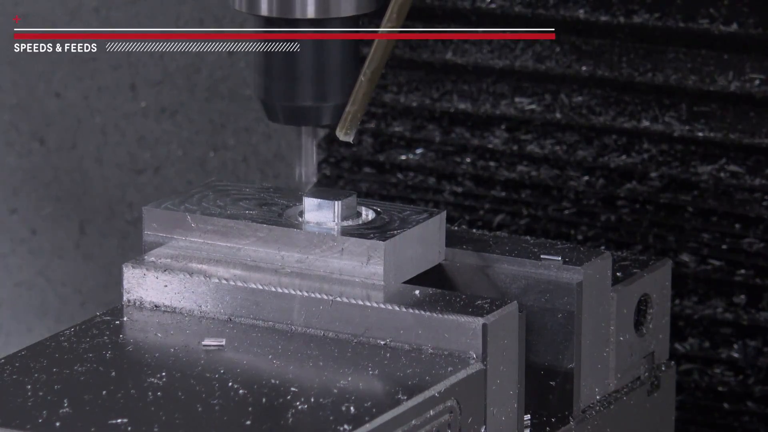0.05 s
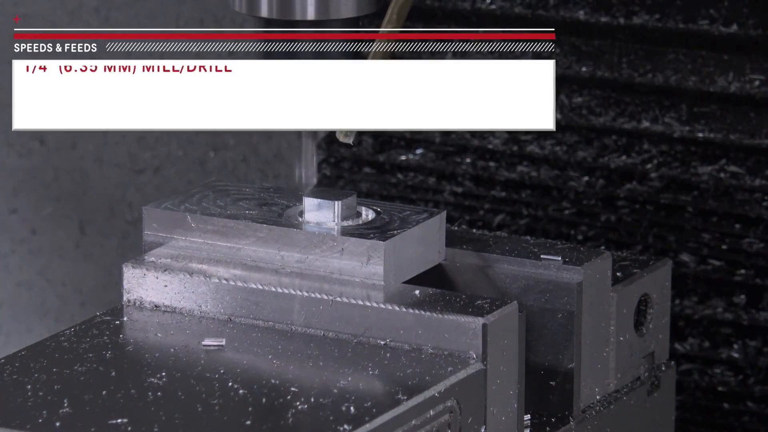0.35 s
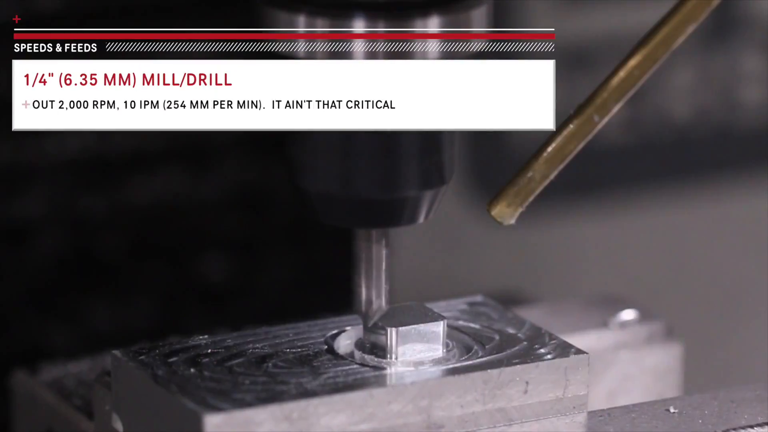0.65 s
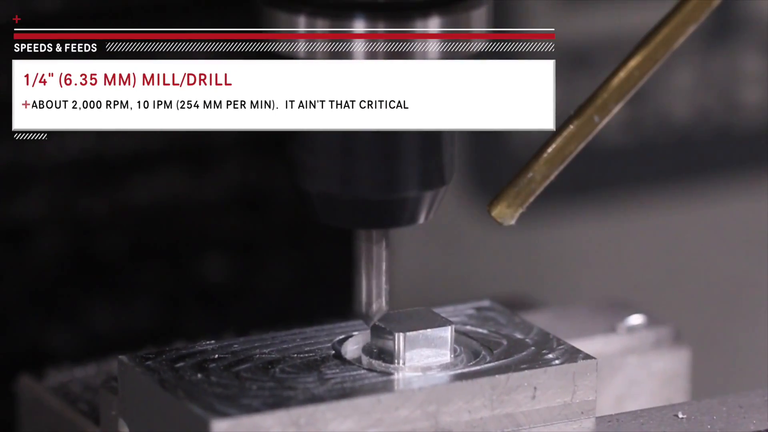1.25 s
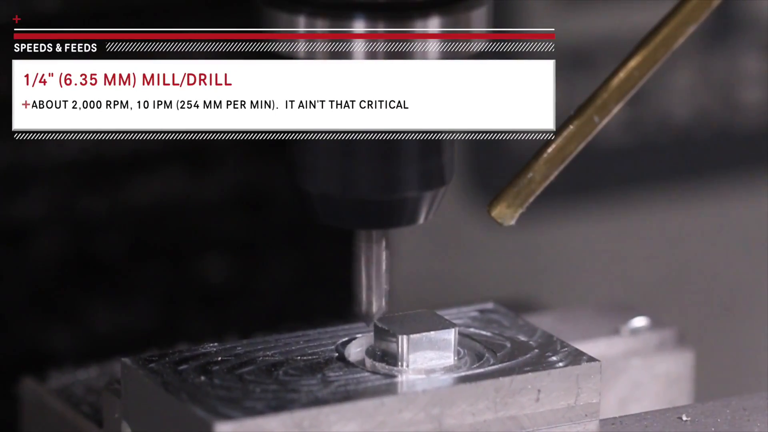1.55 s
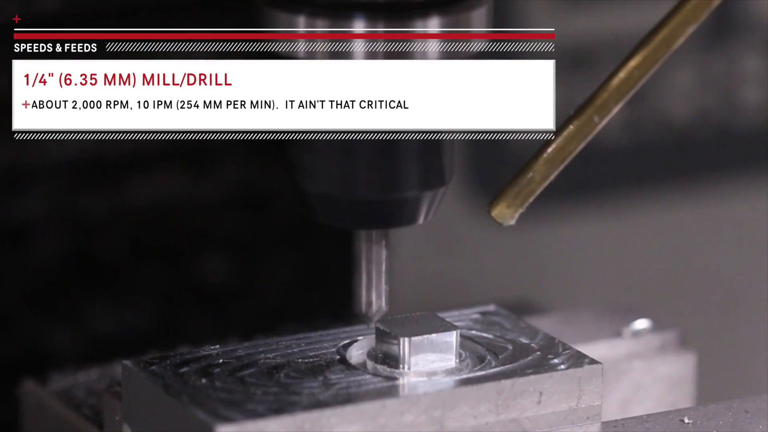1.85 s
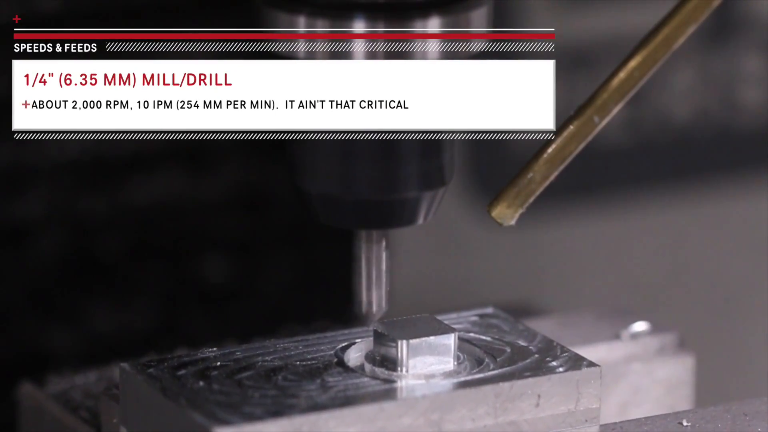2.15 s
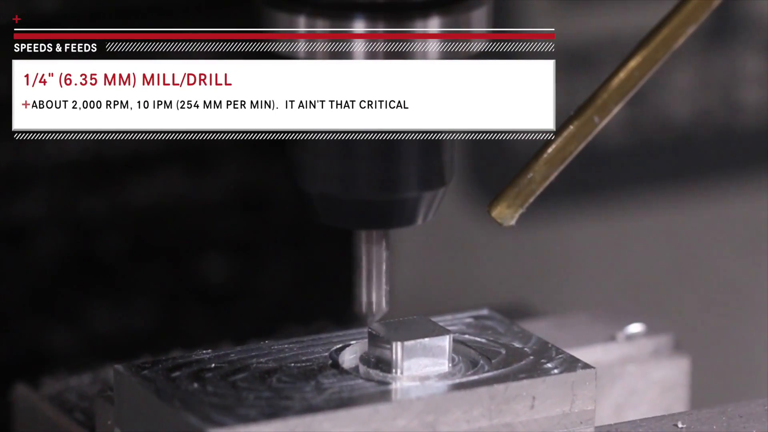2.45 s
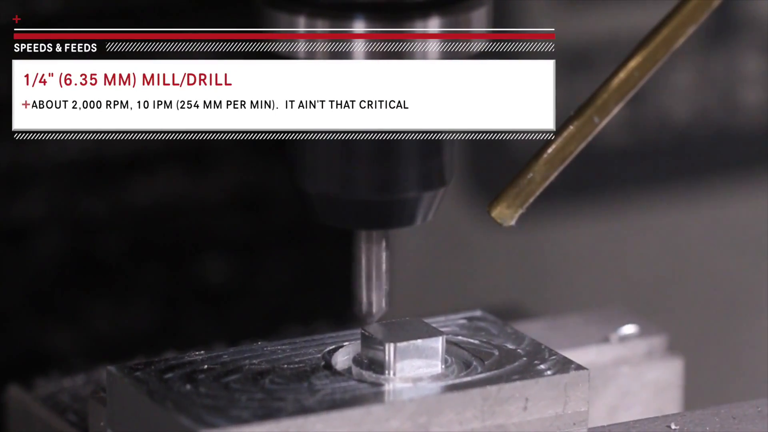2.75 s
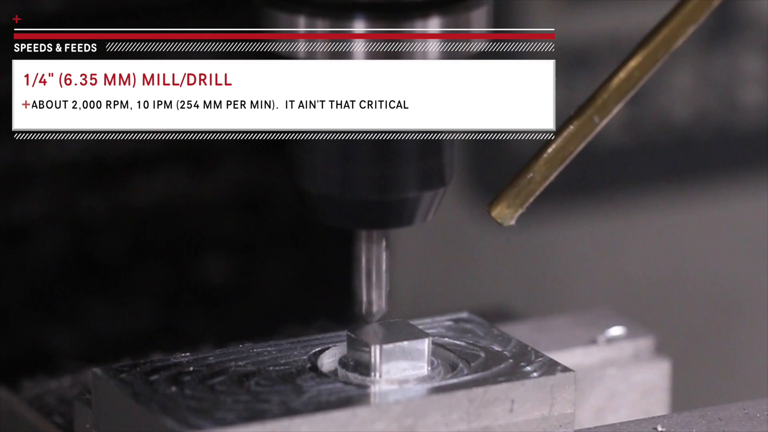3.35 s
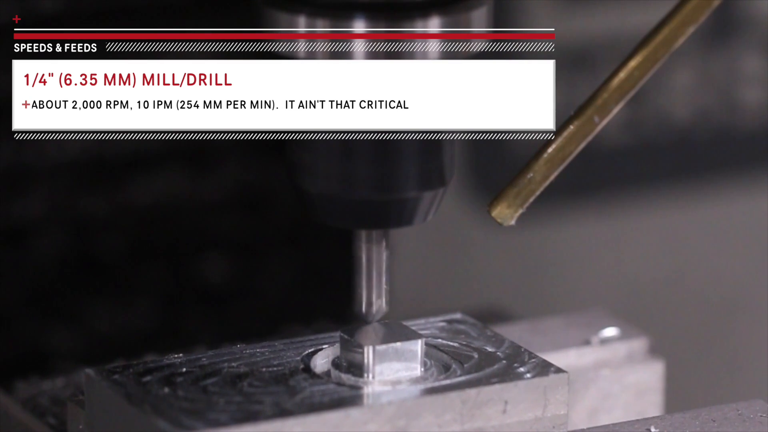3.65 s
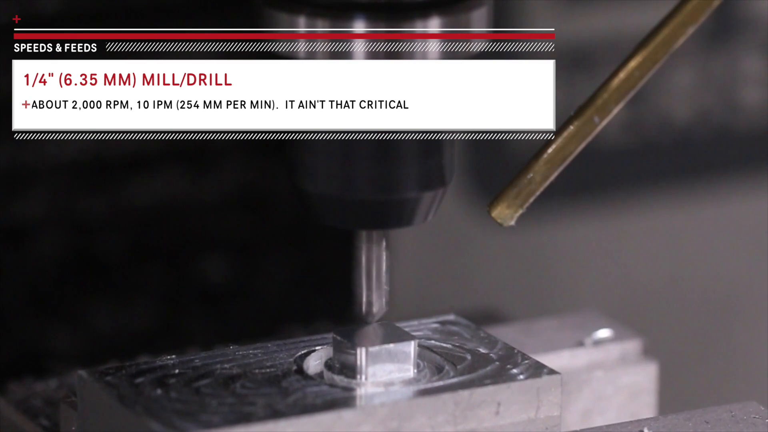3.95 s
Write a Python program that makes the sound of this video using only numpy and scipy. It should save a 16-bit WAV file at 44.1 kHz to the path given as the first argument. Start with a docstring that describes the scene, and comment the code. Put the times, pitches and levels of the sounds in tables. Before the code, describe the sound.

Bright, continuous air hiss blows over metal in a milling machine, heard up close. Beneath it, faint motors hum and change pitch twice with soft jolts. Later the hiss turns slightly louder, hollower and faintly whistling.

```python
"""Milling machine with an air jet

A milling machine cuts round a small metal boss (a raised stub) while a nozzle blows air at the cutter.
The jet hisses steadily; as the table moves, the air catches the edge of the boss and brightens, then
roars lower in the milled pocket. It whistles faintly, and hollow rings shift with the work. Two feed
drives hum below, jolting and trading speed at the corners, over the spindle. Metal walls colour the air."""
import sys
import numpy as np
from scipy import signal
from scipy.fft import rfft, irfft, next_fast_len
from scipy.io import wavfile
from scipy.ndimage import map_coordinates

SR = 44100
rng = np.random.default_rng(int(sys.argv[2]) if len(sys.argv) > 2 else 0)


def transcribe(u):
    """Save the signal u as a 16-bit wav file named by the first command-line argument.

    u: samples, shape (n,) or (channels, n), limited to [-1, 1]; the rate is SR.
    q: integer samples, one column per channel.
    """
    v = np.clip(np.atleast_2d(u).T, -1, 1)
    q = np.round(v * 32767).astype(np.int16)
    wavfile.write(sys.argv[1], SR, q)


N = 176400

# How alike left and right are for air striking the metal. Each row: frequency in Hz, likeness (1 = same).
WORK_LIKENESS = [(300, 1), (1500, 0.98), (2650, 1), (3200, 0.85), (4000, .5), (4600, 0.23), (5900, .05),
                 (8800, .05), (10500, 0.27), (12000, 0.61), (14500, .18)]


def jet():
    """Air rushes out of the nozzle and hisses steadily."""
    # Each row: time in seconds, level in dB.
    levels = [(0, -42.5), (.45, -42), (.9, -41.5), (1.4, -42), (1.75, -44), (2.4, -42), (3.3, -43.5),
              (4, -46)]
    # A bright hiss. Each row: frequency in Hz, relative level in dB.
    colour = [(200, -25), (700, -16.5), (1500, -16.5), (2100, -11.5), (2600, -7), (4500, -2), (7000, -0.8),
              (9400, 0), (12000, -3), (15500, -6.5)]
    # Each row: centre in Hz, width in Hz, boost in dB.
    resonances = [(2480, 200, 2.5), (3080, 420, -2.2), (4985, 170, 4), (5370, 200, 3.2), (6300, 200, 1),
                  (7300, 300, 3), (8250, 200, 1.5), (8720, 280, 3), (9310, 130, 4), (9630, 140, 4)]
    # Each row: frequency in Hz, likeness of left and right (1 = same).
    likeness = [(300, 1), (1500, 0.95), (2650, 1), (3100, 0.83), (4000, 0.65), (4600, 0.19), (6000, 0.29),
                (8500, 0.1), (10500, 0.054), (14000, -0.21)]
    return rushing_air(levels, colour, resonances, likeness)


def edge_hiss():
    """The air strikes the edge of the boss and hisses more brightly."""
    # Each row: time in seconds, level in dB.
    levels = [(0, -92), (1.1, -49), (1.4, -48.5), (1.65, -47), (1.9, -45), (2.2, -41.5), (2.55, -39),
              (2.9, -38.5), (3.35, -39.5), (3.7, -42), (4, -47)]
    # Each row: frequency in Hz, relative level in dB.
    colour = [(300, -26.5), (1000, -18), (1500, -16), (2600, -7.5), (3500, -5.5), (5500, -3), (8000, -4.5),
              (10000, 3), (12000, -1), (15500, -2)]
    # Each row: centre in Hz, width in Hz, boost in dB.
    resonances = [(5080, 260, 6), (5360, 220, 8), (6250, 200, 4.5), (6620, 150, 7), (7450, 220, 7),
                  (8570, 180, 4), (9230, 190, 6.5), (9470, 170, 7), (9800, 100, 1.5), (10060, 90, 4.8),
                  (10290, 140, 7.8), (10570, 150, 3.8), (10770, 140, 3), (11500, 400, 2), (14700, 340, 3.4)]
    return rushing_air(levels, colour, resonances, WORK_LIKENESS)


def rim_blow():
    """Air blows across the rim of the pocket with a hollow ring."""
    # Each row: time in seconds, level in dB.
    levels = [(0, -67.5), (1.4, -63.5), (2.2, -60), (2.55, -57), (2.85, -53.5), (3.15, -57.5),
              (3.45, -60.5), (4, -57.5)]
    # Each row: frequency in Hz, relative level in dB.
    colour = [(150, -17), (320, -6.5), (450, -13.5), (700, -4), (1100, -2.5), (1500, -4.5), (2000, -0.5),
              (3000, -6.5), (6000, -12), (15000, -58)]
    # Each row: centre in Hz, width in Hz, boost in dB.
    resonances = [(675, 41, 7.5), (1004, 115, 5.5), (1207, 150, 4), (1400, 74, 7.5)]
    return rushing_air(levels, colour, resonances, WORK_LIKENESS)


def pocket_roar():
    """Air swirls inside the pocket and roars lower than the jet."""
    # Each row: time in seconds, level in dB.
    levels = [(0, -56), (.6, -56), (1.2, -65), (1.7, -55.5), (2.1, -50.5), (2.75, -49), (3.3, -46.5),
              (4, -44.5)]
    # Each row: frequency in Hz, relative level in dB.
    colour = [(200, -15), (450, -28), (700, -12), (1000, -13), (1500, -6.5), (2000, -4.5), (3400, 1),
              (5500, -4), (8000, -6.5), (15500, -10.5)]
    # Each row: centre in Hz, width in Hz, boost in dB.
    resonances = [(690, 90, 5.5), (1040, 120, 3.5), (1215, 110, 5), (1765, 120, 4), (2255, 110, 6),
                  (2412, 60, 6), (2808, 100, 3), (3125, 80, 4), (3385, 80, 4.5), (3880, 200, -3),
                  (4075, 100, 3), (4485, 80, 3), (4890, 130, 6.5)]
    return rushing_air(levels, colour, resonances, WORK_LIKENESS)


def rushing_air(levels, colour, resonances, likeness):
    """Churning air in stereo: its resonances stand in the middle of a wide hiss."""
    # Peaks and dips from the machine's walls. Each row: centre in Hz, width in Hz, boost in dB.
    enclosure = [(1345, 95, -6.5), (1850, 170, 3), (4400, 130, -2.6), (5950, 180, -1.8), (6900, 120, -3.2),
                 (7100, 120, -1.5), (7690, 200, -1.6), (8975, 110, -3.2), (11120, 160, -2.2)]
    # Each row: frequency in Hz, how much louder left is than right in dB.
    lean = [(300, 0), (900, 0), (3000, 0), (4300, -.5), (6100, 2), (6750, -3), (7700, 1.5), (8550, 1),
            (9500, 4), (10150, -2), (11500, 1.5), (13300, -0.5), (15300, 4)]

    def mid_side_gains(hz):
        # The less alike left and right are, the stronger the side sound.
        side_gain = np.tan(np.arccos(np.clip(along(likeness, hz), -.9, .999)) / 2)
        boost_db = bells(resonances, hz) + bells(enclosure, hz)
        side_boost_db = .21 * boost_db
        return amp(along(colour, hz)) * np.array([amp(boost_db), side_gain * amp(side_boost_db)])

    mid, side = filtered(wall_echoes(eddies()), mid_side_gains)
    stereo = np.array([mid + side, mid - side])
    stereo = filtered(stereo, lambda hz: amp(np.outer([.5, -.5], along(lean, hz))))
    level_db, = curves(levels)
    flutter_db = .35 * wobble(per_second=25)
    return stereo / mid.std() * amp(level_db + flutter_db)


def eddies(depth_db=1, patch_hz=159.9, patch_s=.12):
    """Two noises, mid and side, whose colour shifts in patches as the jet wanders."""
    block = 1024
    spectra = signal.stft(rng.standard_normal((2, N)), nperseg=block)[2]
    band, step = np.indices(spectra.shape[1:])
    position = [band * SR / block / patch_hz, step * (block // 2) / SR / patch_s]
    patches = map_coordinates(rng.standard_normal((400, 150)), position, mode="wrap")
    return signal.istft(spectra * amp(depth_db * patches), nperseg=block)[1][:, :N]


def wall_echoes(noises, near_share=.42, near_delay_s=.0014, echo_gain=.22, echo_fade_s=.017):
    """Near walls throw the hiss to the sides; many short echoes follow from all the walls."""
    mid, side = noises
    t = np.arange(SR // 10) / SR
    near = rng.standard_normal(len(t)) * t * np.exp(-t / near_delay_s)
    thrown = signal.fftconvolve(mid, near / np.linalg.norm(near))[:N]
    early = np.array([mid, np.sqrt(1 - near_share) * side + np.sqrt(near_share) * thrown])
    echoes = rng.standard_normal((2, len(t))) * np.exp(-t / echo_fade_s)
    echoes /= np.linalg.norm(echoes[0])
    return early + echo_gain * signal.fftconvolve(early, echoes, axes=1)[:, :N]


def whistles():
    """The jet whistles breathily; the rim and pocket ring as they move under it."""
    # Each row in all four: time in seconds, pitch in Hz, level in dB.
    jet_whistle = [(0, 4140, -56.5), (1.35, 4135, -59), (1.65, 4125, -63), (2.3, 4120, -57), (4, 4108, -57)]
    rim_ring = [(0, 1853, -76), (2.3, 1910, -68.5), (2.65, 1883, -60.5), (3.15, 1810, -59),
                (3.5, 1791, -67), (4, 1753, -62)]
    pocket_low = [(0, 2804, -71), (2.3, 2823, -66), (2.8, 2893, -57), (3.1, 2830, -65), (3.65, 2820, -58),
                  (4, 2820, -57)]
    pocket_high = [(0, 3560, -79), (2.7, 3560, -59), (3.2, 3550, -56.5), (3.65, 3537, -57), (4, 3530, -59)]
    return (whistle(jet_whistle, width_hz=170) + whistle(rim_ring, width_hz=134)
            + whistle(pocket_low, width_hz=110) + whistle(pocket_high, width_hz=140))


def whistle(rows, width_hz):
    """Air rings in a narrow band of noise whose pitch drifts as the table moves."""
    hz, level_db = curves(rows)
    slow_noise = filtered(rng.standard_normal((2, N)), lambda f: 1 / (1 + (2 * f / width_hz) ** 4))
    phase = 2 * np.pi * np.cumsum(hz) / SR
    band = slow_noise[0] * np.cos(phase) + slow_noise[1] * np.sin(phase)
    return unit(band) * amp(level_db)


def feed_drives():
    """Two motors move the table, each humming at a pitch that follows its speed."""
    # Each row in both: time in seconds, pitch in Hz, level in dB.
    first_drive = [(0, 153.1, -72.5), (.54, 146, -79), (.595, 130.2, -63), (.655, 100, -67),
                   (.69, 115.4, -67), (.77, 122, -76), (.81, 123, -62.5), (.87, 104, -66), (.95, 85.8, -68),
                   (1.76, 84.7, -66.5), (1.85, 80, -79), (1.98, 84.2, -72), (2.07, 100.3, -58),
                   (2.135, 110, -68), (2.19, 118, -54), (2.26, 132, -66), (2.34, 146, -58.5),
                   (2.39, 154, -72), (2.7, 167.8, -71.5), (3.2, 168.4, -72.5), (4, 170, -70)]
    second_drive = [(0, 108.6, -97), (.66, 117, -85), (.75, 142, -64), (.8, 159, -73), (.86, 168, -69),
                    (.91, 169, -64), (1.7, 168.3, -61.5), (1.88, 168, -68), (1.94, 154.3, -59),
                    (2.01, 144, -55), (2.045, 135, -60), (2.13, 120.5, -68), (2.19, 113, -57),
                    (2.25, 108, -62), (2.34, 102.6, -64), (2.39, 99, -69), (2.6, 84.7, -70.5),
                    (4, 84.86, -74)]
    hum = np.zeros(N)
    for hz, level_db in (curves(first_drive), curves(second_drive)):
        hum += tone(hz) * amp(level_db + 1.3 * wobble(per_second=29.67))
    return hum


def jolts(rise_s=.006):
    """A drive brakes or starts, giving a soft, low push that dies quickly in the frame."""
    # Each row: start in seconds, pitch in Hz, peak level in dB.
    pushes = [(.613, 120, -52), (.726, 140, -52.5), (2.08, 112, -56), (2.186, 116, -51.5),
              (2.313, 135, -54), (2.342, 140, -57)]
    thuds = np.zeros(N)
    for start, hz, db in pushes:
        age = np.maximum(np.arange(N) / SR - start, 0)
        envelope = age / rise_s * np.exp(1 - age / rise_s)
        thuds += amp(db) * np.sin(2 * np.pi * hz * age) * envelope
    return thuds


def frame_rumble(level_db=-67.5):
    """The frame rumbles all the time and shudders as the table turns a corner."""
    # Each row in both: frequency in Hz, relative level in dB.
    steady_colour = [(20, -45), (40, -34), (60, -36), (78, -13), (110, -0.5), (150, 3), (240, -8),
                     (330, -5), (450, -7), (600, -4.5), (1500, -17), (5000, -44)]
    shudder_colour = [(50, -38), (85, -2), (115, -2), (160, -14), (260, -11), (800, -37), (3000, -70)]
    # Each row: middle of the shudder in seconds, length in seconds, level in dB.
    corners = [(.78, .24, -70), (2.22, .42, -66.5)]
    shudder = bells([(s, length, amp(db)) for s, length, db in corners], np.arange(N) / SR)
    return amp(level_db) * rumble(steady_colour) + shudder * rumble(shudder_colour)


def spindle(waver_db=2.6):
    """The turning spindle and cutter hum faintly at a few steady pitches."""
    # Each row: pitch in Hz, level in dB.
    hums = [(51, -94), (108, -81), (204, -79), (305, -79), (372, -81)]
    return sum(tone(hz) * amp(db + waver_db * wobble(per_second=5.98)) for hz, db in hums)


def tone(hz, drift=.0026):
    """A sine wave of strength 1 whose pitch wanders slightly."""
    cycles = np.cumsum(hz * (1 + drift * wobble(per_second=12))) / SR
    return np.sqrt(2) * np.sin(2 * np.pi * (cycles + rng.random()))


def rumble(colour):
    """Noise of strength 1 with the given balance of low and high frequencies."""
    return unit(filtered(rng.standard_normal(N), lambda hz: amp(along(colour, hz))))


def amp(db):
    """Turn decibels into a gain."""
    return 10 ** (np.asarray(db) / 20)


def unit(x):
    """Scale a signal to an average strength (rms) of 1."""
    return x / np.sqrt(np.mean(x ** 2) + 1e-20)


def along(points, hz):
    """Read between (frequency, value) points, with octaves evenly spaced."""
    frequencies, values = np.transpose(points)
    return np.interp(np.log(hz + 1), np.log(frequencies + 1), values)


def bells(rows, x):
    """Add up bell-shaped bumps along frequency or time."""
    return sum(height * .5 ** ((2 * (x - centre) / width) ** 2) for centre, width, height in rows)


def curves(rows):
    """Give each column after the time one value per sample."""
    times, *columns = np.transpose(rows)
    return [np.interp(np.arange(N) / SR, times, column) for column in columns]


def wobble(per_second):
    """A smooth curve through this many random values a second."""
    values = rng.standard_normal(int(N * per_second / SR) + 4)
    return map_coordinates(values, [np.arange(N) * per_second / SR])


def filtered(x, gain_at):
    """Turn each frequency up or down by gain_at(hz)."""
    size = next_fast_len(N + SR // 2)
    hz = np.fft.rfftfreq(size, 1 / SR)
    return irfft(rfft(x, size) * gain_at(hz), size)[..., :N]


def scene():
    """Four layers of air and their whistles over the hum of the machine."""
    air = jet() + edge_hiss() + rim_blow() + pocket_roar()
    machine = feed_drives() + spindle() + frame_rumble() + jolts()
    return air + whistles() + machine * amp([[.8], [-.8]])  # the hum sits a little to the left


def record(dry, bass_cut_hz=49, top_hz=15730):
    """The microphone loses the deepest bass and the very highest treble."""
    return filtered(dry, lambda hz: hz ** 2 / np.hypot(hz ** 2, bass_cut_hz ** 2) * (hz < top_hz))


dry = scene()
out = record(dry)
transcribe(out)
```